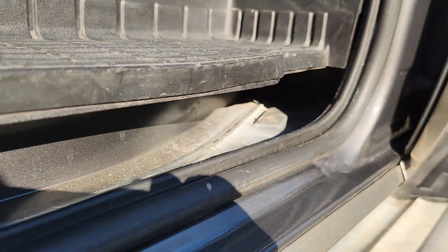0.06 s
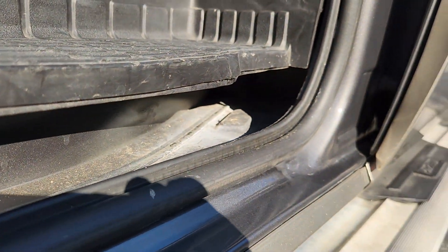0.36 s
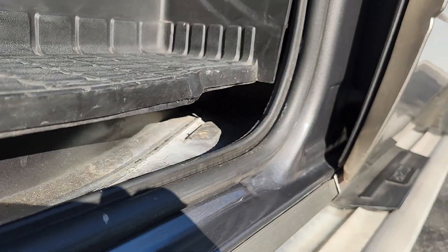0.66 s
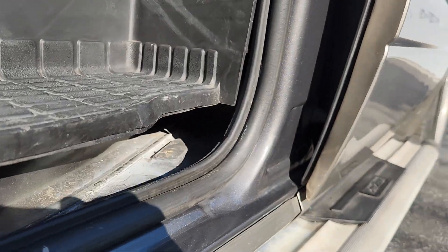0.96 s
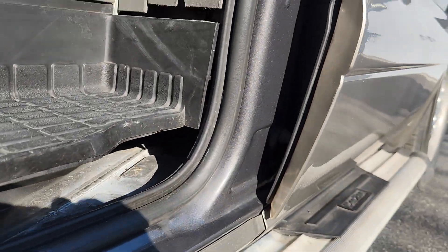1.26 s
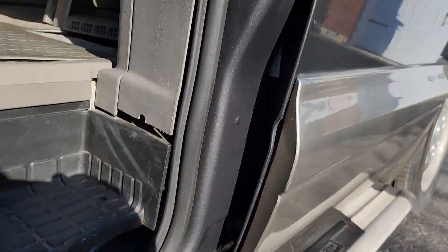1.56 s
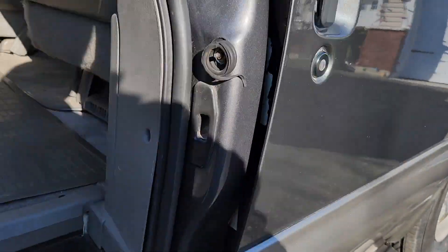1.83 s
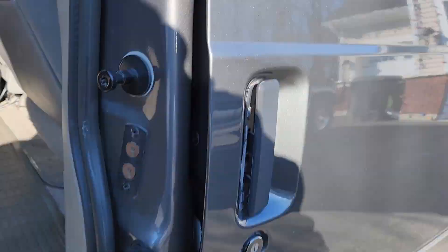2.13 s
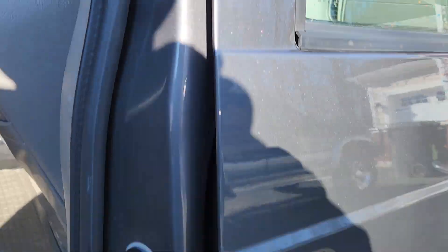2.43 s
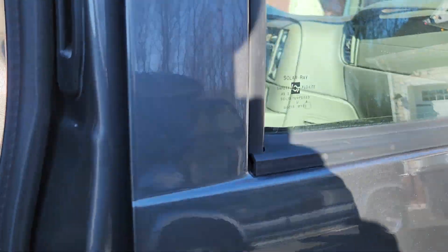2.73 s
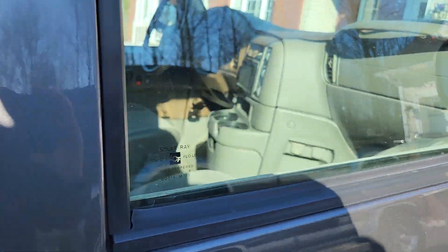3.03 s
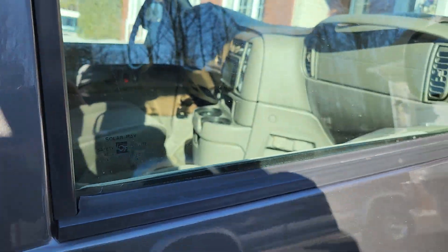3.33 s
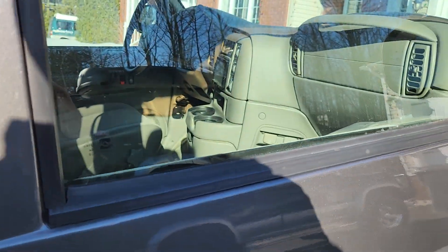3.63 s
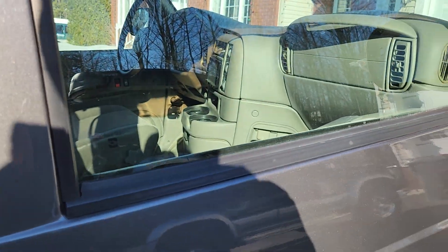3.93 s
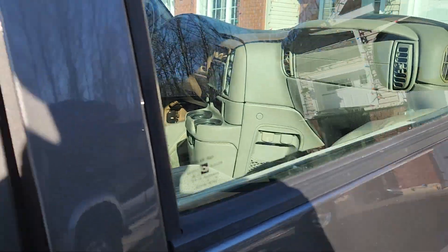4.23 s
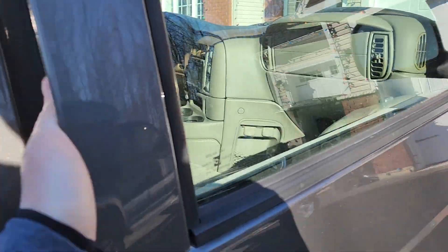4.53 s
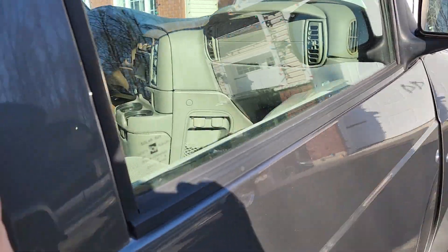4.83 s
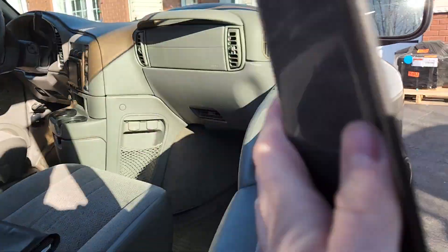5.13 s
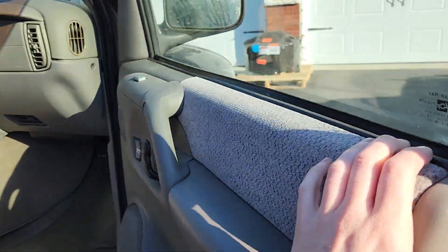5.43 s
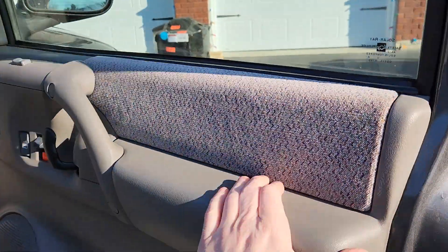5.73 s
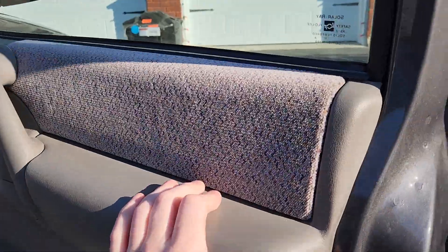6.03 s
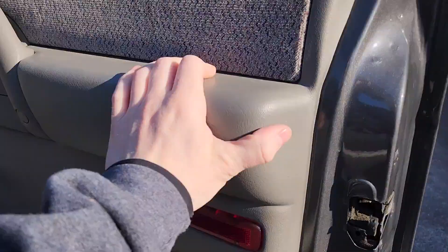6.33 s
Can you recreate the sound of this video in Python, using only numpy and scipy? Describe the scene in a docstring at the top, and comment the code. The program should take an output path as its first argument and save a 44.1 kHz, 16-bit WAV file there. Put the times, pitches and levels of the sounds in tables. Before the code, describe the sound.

A van's sliding door rumbles along its track and slams shut, then the front door unlatches and creaks open, close by outdoors.

```python
"""A van's sliding side door, close by outdoors: freed from its catch, it rolls along its track and
slams into its latch. Blows ring its panel and steel fittings; its rollers drone, rumble and rattle.
Then the front door's handle squeaks, its lock snaps open and it swings out, creaking and clicking
at the hinge check. Keys jingle early on; a hand brushes the cloth trim and pats the armrest.
Air buffets the microphones over a faint outdoor hum."""
import sys
import numpy as np
from scipy import signal
from scipy.fft import rfft, irfft, next_fast_len
from scipy.io import wavfile

SR = 44100
rng = np.random.default_rng(int(sys.argv[2]) if len(sys.argv) > 2 else 0)


def transcribe(u):
    """Save the signal u as a 16-bit wav file named by the first command-line argument.

    u: samples, shape (n,) or (channels, n), limited to [-1, 1]; the rate is SR.
    q: integer samples, one column per channel.
    """
    v = np.clip(np.atleast_2d(u).T, -1, 1)
    q = np.round(v * 32767).astype(np.int16)
    wavfile.write(sys.argv[1], SR, q)


N = 281358
TIME = np.arange(N) / SR

# how hard the sliding door bears on its track, as rumble: (time [s], level [dB])
TRACK_LOAD = [(2.12, -33), (2.19, -38), (2.25, -24.5), (2.38, -21.5), (2.455, -20), (2.53, -19.5),
              (2.63, -19), (2.738, -21.5), (2.84, -23.5), (2.915, -24), (2.986, -20.5), (3.03, -18),
              (3.186, -18.5), (3.22, -21)]
# modes of the sliding door's steel fittings: (frequency [Hz], level [dB], t60 [s])
SLIDER_STEEL_MODES = [(787, 0.5, 0.097), (1170, -12, 0.094), (1370, 0, 0.062), (1330, 2, 0.044),
                      (1500, 0, 0.1), (1980, 1.5, 0.019), (1945, -5, 0.068), (2310, -2, 0.12),
                      (2490, -2.5, 0.039), (3220, -7.5, .07), (3750, -14, .07), (4650, -21.5, 0.059),
                      (6340, -10, 0.084)]
GRIT_DB, GRIT_FADE_DB_PER_S = -34.5, 5.5  # track grit fades as the rollers move away
RESONANCE_DB = 4.5  # how far a door's crowded resonances stand out


def from_db(db):
    """Decibels to gain."""
    return np.exp(np.asarray(db) * (np.log(10) / 20))


def rms_one(x):
    """Scale to unit rms."""
    return x / np.sqrt(np.mean(x ** 2) + 1e-20)


def at_hz(points, hz):
    """Read a spectrum on a log-frequency axis."""
    point_hz, value = np.transpose(points)
    return np.interp(np.log(np.maximum(hz, 1)), np.log(point_hz), value)


def add(track, s, sound):
    """Mix a short sound in at time s."""
    start = int(s * SR)
    track[..., start:start + sound.shape[-1]] += sound[..., :N - start]


def fader(points, fade_s=0.011):
    """A gain that rides through (time [s], level [dB]) points and fades out beyond the ends."""
    s, db = np.transpose(points)
    gate = np.interp(TIME, [s[0] - fade_s, s[0], s[-1], s[-1] + fade_s], [0, 1, 1, 0])
    return gate * from_db(np.interp(TIME, s, db))


def swells(times, lengths, levels_db, shape):
    """Envelope of movements that rise and die away; lengths are widths at half height."""
    power = np.zeros(N)
    for s, length, db in zip(times, lengths, levels_db):
        near = slice(max(int((s - 3 * length) * SR), 0), int((s + 3 * length) * SR))
        from_peak = np.abs(2 * (TIME[near] - s) / length)
        power[near] += (from_db(db) * .5 ** (from_peak ** shape)) ** 2
    return np.sqrt(power)


def decays(times, levels_db, t60s, tail_db, tail_t60):
    """Envelope of dense ringing: a sharp attack, a quick fall and a weaker tail from the hollow body."""
    t, power = TIME[:SR * 3 // 4], np.zeros(N)
    attack = 1 - np.exp(-t / 0.0008)
    for s, level_db, t60 in zip(times, levels_db, t60s):
        fall = from_db(-60 * t / t60) ** 2 + from_db(tail_db - 60 * t / tail_t60) ** 2
        add(power, s, from_db(level_db) ** 2 * fall * attack)
    return np.sqrt(power)


def flutter(rate, depth_db):
    """A random gain of unit rms that changes about rate times a second."""
    knots = rng.standard_normal(20000)
    return rms_one(from_db(depth_db * np.interp(TIME * rate, np.arange(len(knots)), knots)))


def noise(colour, lag_ms=0, ripple_db=0):
    """Stereo noise of unit rms, coloured by (frequency [Hz], level [dB]); the right side lags."""
    # likeness of left and right: (frequency [Hz], correlation [0-1])
    likeness = [(25, 0.8), (80, 0.95), (250, 0.97), (600, 0.62), (1500, 0.43), (4000, 0), (15000, 0.03)]
    size = next_fast_len(N, True)
    hz = np.fft.rfftfreq(size, 1 / SR)
    peaks_and_dips = rng.uniform(0, 1.7, 200) * (-1) ** np.arange(200)
    resonances = np.interp(1.3 * np.sqrt(hz), np.arange(200), peaks_and_dips)
    tone = from_db(at_hz(colour, hz) + ripple_db * resonances)
    mid, side = rfft(rng.standard_normal((2, size))) * tone
    alike = np.clip(at_hz(likeness, hz), 0, 1)
    mid, side = mid * np.sqrt(1 + alike), side * np.sqrt(1 - alike)
    delay = np.exp(-2j * np.pi * hz * lag_ms / 1000)
    return rms_one(irfft([mid + side, (mid - side) * delay], size)[:, :N])


def struck(times, levels_db, modes, lag_ms, spread):
    """Blows ring all modes with random strength and sign; spread [rad] scatters the right's phases."""
    hz, db, t60 = np.transpose(modes)[:, :, None]
    t, out = TIME[:int(t60.max() * SR)], np.zeros((2, N))
    skew = spread * rng.standard_normal(hz.shape)
    left = np.sin(2 * np.pi * hz * t)
    right = np.sin(2 * np.pi * hz * (t - lag_ms / 1000) + skew)
    rings = np.array([left, right]) * from_db(-60 * t / t60) * (1 - np.exp(-t * hz * 4))
    for s, level_db in zip(times, levels_db):
        share = from_db(db[:, 0] + rng.normal(0, 3.2, len(db))) * rng.choice([-1, 1], len(db))
        add(out, s, from_db(level_db) * np.sqrt(2) * (share / np.linalg.norm(share)) @ rings)
    return out


def damped_tones(rows):
    """One decaying sine for each (time [s], level [dB], frequency [Hz], t60 [s])."""
    t, out = TIME[:SR], np.zeros(N)
    for s, db, hz, t60 in rows:
        attack = 1 - np.exp(-t * hz * 4)
        add(out, s, from_db(db - 60 * t / t60) * np.sin(2 * np.pi * hz * t) * attack)
    return out


def outdoors(hum_hz=92, hum_db=-39, fade_db_per_s=48.5):
    """A quiet outdoor bed, with a far engine's hum that fades away."""
    # outdoor ambience: (frequency [Hz], level [dB])
    colour = [(15, -47.5), (25, -25.5), (76, -4), (108, 0.5), (301, -18), (531, -39), (659, -27.5),
              (1160, -48), (2110, -42), (4140, -57.5), (7510, -43), (10400, -61.5), (16000, -61.5)]
    hum = from_db(hum_db - fade_db_per_s * TIME) * np.sin(2 * np.pi * hum_hz * TIME)
    return from_db(-51.0) * noise(colour) + hum


def wind(breeze_db=-71.5):
    """Moving doors and body push puffs of air onto the microphones, over a light breeze."""
    # puffs of air: (time [s], length [s], level [dB])
    gusts = [(1.2, 0.7, -53.5), (1.61, 0.19, -38.5), (2.171, 0.11, -29.5), (2.596, 0.92, -40.5),
             (3.069, 0.15, -30), (3.279, 0.24, -15.5), (3.551, 0.72, -38), (3.961, 0.13, -30),
             (4.333, 0.12, -36.5), (4.596, 0.11, -40), (5.3, 0.34, -36), (5.883, 0.21, -33),
             (6.329, 0.093, -33)]
    # low buffeting: (frequency [Hz], level [dB])
    colour = [(18, 9), (42, 12), (70, 16), (110, 12), (160, -4), (300, -55.5)]
    strength = from_db(breeze_db) + swells(*np.transpose(gusts), shape=1.5)
    return from_db(-1.5) * strength * noise(colour)


def sleeve_drag():
    """The sleeve drags over the plastic armrest with a narrow, grainy hiss."""
    # cloth on plastic: (frequency [Hz], level [dB])
    colour = [(2800, -15), (3900, -4), (4600, 1), (5200, -4), (6500, -27)]
    stroke = swells(times=[6.12], lengths=[0.34], levels_db=[-67], shape=3.6)
    return stroke * noise(colour, lag_ms=0.05) * flutter(rate=120, depth_db=3.0)


def finger_sweep():
    """The woven trim hisses brightly under the fingers."""
    # the fingers' stroke: (time [s], level [dB])
    stroke = [(5.53, -57), (5.57, -51.5), (5.64, -49.5), (5.72, -46.5), (5.78, -71), (5.86, -66)]
    # hiss of the weave: (frequency [Hz], level [dB])
    colour = [(3000, -15), (6000, -7.5), (9500, -6.5), (12000, -5), (15500, 3), (17000, -20)]
    return fader(stroke) * noise(colour, lag_ms=0.014) * flutter(rate=310, depth_db=1.5)


def scrape():
    """Light, even friction stirs two narrow resonances before the sliding door is freed."""
    # the scrape's resonances: (frequency [Hz], level [dB])
    colour = [(900, -25), (1400, -2), (1620, 3), (1850, -9), (2150, -5), (2800, -27)]
    stroke = swells(times=[1.5], lengths=[0.34], levels_db=[-57], shape=6.1)
    return stroke * noise(colour, lag_ms=0.1) * flutter(rate=60, depth_db=5.0)


def handling(rustle_share=0.45):
    """Cloth and skin slide in tiny slips: a dull rub, with rustle and hiss on brighter strokes."""
    # strokes of sleeve and hand: (time [s], length [s], rub level [dB], brightness [dB])
    strokes = [(0.356, 0.12, -83, 2), (1.02, 0.23, -69, -1.5), (1.259, 0.065, -46, -34),
               (1.473, 0.28, -53.5, -9.5), (1.82, 0.61, -62.5, -1.5), (2.073, 0.085, -44, -3.5),
               (3.364, 0.18, -36.5, -36.5), (3.708, 0.033, -49, -38), (3.84, 0.035, -46, -26),
               (3.941, 0.17, -44.5, -38), (4.168, 0.054, -57, -3.5), (4.264, 0.048, -44.5, 0.5),
               (4.362, 0.34, -57, -19.5), (4.687, 0.14, -46.5, -30.5), (4.785, 0.023, -49, -25),
               (4.86, 0.078, -47, -27), (5.25, 0.062, -51, -21), (5.163, 0.16, -53, -19),
               (5.325, 0.08, -43, -12.5), (5.439, 0.054, -48.5, -1), (5.664, .2, -63.5, 3.5),
               (5.756, 0.05, -38, -16.5), (5.804, 0.028, -46.5, -5.5), (5.84, 0.055, -44, -9),
               (6.032, 0.31, -59.5, -11.5), (6.34, 0.18, -55, -9.5)]
    # the three bands of cloth friction: (frequency [Hz], level [dB])
    rub_colour = [(90, -2.5), (160, -5.5), (380, 3.5), (650, -7.5), (1000, -17.5), (1800, -63)]
    rustle_colour = [(600, -12), (1000, -7), (1200, 2), (1550, 6), (2200, 5.5), (2900, -15.5), (3600, -6),
                     (4500, -17), (7000, -15.5)]
    hiss_colour = [(2500, 0.5), (4500, -3), (7500, -4.5), (9500, -13), (12000, -15), (15500, -8)]
    s, length, db, brightness = np.transpose(strokes)
    rub = noise(rub_colour, lag_ms=0.048, ripple_db=RESONANCE_DB) * flutter(rate=28, depth_db=3.0)
    rustle = noise(rustle_colour, lag_ms=0.13, ripple_db=RESONANCE_DB) * flutter(rate=180, depth_db=3.5)
    hiss = noise(hiss_colour, lag_ms=0.036) * flutter(rate=180, depth_db=3.5)
    bands = [(rub, 0, -62, -0.5), (rustle, rustle_share, -84, 1), (hiss, 1, -83, 8)]
    out = 0
    for band, share, floor_db, gain_db in bands:
        motion = swells(s, length, db + share * brightness, shape=2.17)
        # the floor is a faint, steady background hiss and rustle under the strokes
        out += from_db(gain_db) * (motion + from_db(floor_db)) * band
    return out


def keys(count, scatter_s=0.015, pitch_spread=0.02):
    """At each shake the keys slide over each other, and count of them clink with uneven force."""
    # shakes of the bunch: (time [s], level [dB])
    shakes = [(1.744, -51), (1.85, -56.5), (1.99, -58), (2.04, -48), (2.09, -55)]
    # modes of a key: (frequency [Hz], level [dB], t60 [s])
    modes = [(6460, 11, 0.052), (7500, -7, 0.042), (7960, -10, 0.069), (9000, -7, 0.035), (10200, 2, 0.53),
             (11400, 10, 0.078), (12300, -10, 0.043), (13400, -6, .04), (14120, 11, 0.12), (15250, -2, 0.1),
             (15650, -10, 0.031)]
    s, db = np.repeat(shakes, count, axis=0).T
    timing, force, tuning = rng.standard_normal((len(s), 3)).T
    touches = zip(s + scatter_s * timing, db + 1.7 * force, np.exp(pitch_spread * tuning))
    clinks = sum(struck([at], [level_db], np.multiply(modes, [pitch, 1, 1]), lag_ms=0.069, spread=1.5)
                 for at, level_db, pitch in touches)
    s, db = np.transpose(shakes)
    sliding = swells(s, np.full(len(s), .07), db, shape=0.91) * flutter(rate=260, depth_db=7.0)
    colour = [(4000, -21), (6500, -1), (9000, -8), (10500, -9), (13000, -15), (15300, 5), (16500, -15)]
    return clinks + sliding * noise(colour)


def scratches():
    """Metal slips on metal: brief, thin chirps with a slight rasp."""
    # dry scratches: (time [s], length [s], pitch [Hz], level [dB])
    slips = [(1.515, 0.019, 10200, -51), (1.549, 0.0095, 10250, -43), (1.565, 0.023, 10250, -52),
             (1.72, 0.018, 10340, -51), (1.883, 0.014, 8070, -47.5), (1.887, 0.022, 8650, -52),
             (2.108, 0.051, 10200, -54), (2.218, 0.0084, 6570, -42.5), (2.26, 0.013, 8200, -47),
             (2.295, 0.019, 8150, -50)]
    wavering_time = np.cumsum(flutter(rate=2500, depth_db=.19)) / SR
    chirps = sum(swells([s], [length], [db], shape=1.65) * np.sin(2 * np.pi * hz * wavering_time)
                 for s, length, hz, db in slips)
    return np.sqrt(2) * chirps * flutter(rate=490, depth_db=3.5)


def pings():
    """Small metal parts each ring with one flickering note."""
    # metal pings: (time [s], pitch [Hz], level [dB], t60 [s])
    notes = [(4.653, 3800, -49, 0.044), (5.430, 8660, -52, 0.39), (5.437, 3640, -30.5, 0.027),
             (5.447, 5130, -39.5, 0.11), (5.466, 4900, -47, 0.042), (5.965, 5000, -54, .05)]
    return damped_tones([(s, db, hz, t60) for s, hz, db, t60 in notes]) * flutter(rate=400, depth_db=5.0)


def body_thumps(width_octaves=0.22):
    """A shove sets the van's body booming, most in the modes near its own pitch."""
    # heavy shoves: (time [s], level [dB], centre [Hz])
    shoves = [(1.792, -19, 730), (1.801, -26, 487), (1.811, -23, 322), (2.076, -16, 112),
              (2.078, -19.5, 410), (2.235, -22.5, 328), (2.425, -16.5, 199), (3.104, -13.5, 68.5),
              (3.227, -10, 44.45), (3.247, -10.5, 566), (3.3, -14, 170.5), (3.311, -16, 59),
              (3.418, -28, 262), (3.486, -24.5, 71.4), (3.853, -27.5, 147), (3.881, -28.5, 413),
              (3.93, -18.5, 97), (3.934, -25.5, 196.6), (3.972, -26, 165.4), (4.015, -25.5, 66.6),
              (4.274, -21, 650), (4.275, -20.5, 140.8), (4.279, -25, 450), (4.284, -21.5, 190),
              (4.292, -26.5, 250), (5.186, -29, 103.4), (5.429, -22, 84), (5.735, -20.5, 103),
              (5.747, -21, 119), (5.838, -16.5, 325)]
    # modes of body and cabin: (frequency [Hz], t60 [s])
    modes = [(41.4, 0.69), (57, 0.84), (72, 0.22), (89, 0.12), (111, 0.16), (133, 0.083), (153, 0.42),
             (178, 0.18), (225, 0.29), (275, 0.066), (345, 0.05), (413, 0.086), (475, 0.041), (540, 0.068),
             (615, 0.042), (700, 0.034), (855, 0.075)]
    hz, t60 = np.transpose(modes)
    tones = []
    for s, db, centre_hz in shoves:
        share = 1 / (1 + (np.log2(hz / centre_hz) / width_octaves) ** 2) ** 2
        levels_db = db + 20 * np.log10(share / np.linalg.norm(share))
        tones += [(s, *mode) for mode in zip(levels_db, hz, t60)]
    return damped_tones(tones)


def door_blows(hits, panel_modes, steel_modes, *, lag_ms, panel_lag_ms, panel_db, thud_db, steel_db,
               shimmer_db, clack_db, crack_db, tick_db, t60, tail_db, tail_t60):
    """Blows ring panel and steel; small parts merge into clack, crack and tick, brighter if harder."""
    s, panel, clack, hardness = np.transpose(hits)
    crack, tick = clack + 0.44 * hardness, clack + hardness  # mid and top treble levels
    t60 = t60 * .5 ** (hardness / 31)  # a blow 31 dB harder rings half as long
    out = struck(s, panel + panel_db, panel_modes, panel_lag_ms, spread=0.32)
    out += struck(s, clack + steel_db, steel_modes, lag_ms, spread=1.0)
    # rods and springs shimmer on after the contact
    for level_db, low_hz, high_hz in [(crack, 2800, 9000), (tick, 9000, 15800)]:
        ring_s = rng.uniform(.012, .05, size=100)
        rods = np.c_[rng.uniform(low_hz, high_hz, size=100), rng.normal(0, 3, size=100), ring_s]
        out += struck(s, level_db + shimmer_db, rods, lag_ms, spread=1.0)
    clacks = noise([(250, -18), (550, 1.5), (850, 0), (1150, 4.5), (1500, 4), (2350, -1), (2900, -6),
                    (4200, -35.5)], lag_ms, RESONANCE_DB)
    cracks = noise([(2000, -19.5), (3100, 2), (4500, 0.5), (7000, -1.5), (9000, -12.5), (12000, -13.5)],
                   lag_ms, RESONANCE_DB)
    ticks = noise([(6500, -16), (9000, -0.5), (11500, -3), (13000, 3.5), (14600, 4.5), (15900, -0.5),
                   (17000, -17.5)], lag_ms, RESONANCE_DB)
    clatter = clacks * decays(s, clack + clack_db, t60 * 1.74, tail_db, tail_t60)
    clatter += cracks * decays(s, crack + crack_db, t60, tail_db - 0.5, tail_t60 * 0.88)
    clatter += ticks * decays(s, tick + tick_db, t60 * 0.75, tail_db - 1.5, tail_t60 * .5)
    # trim and insulation add a dull thud with no note of its own
    thuds = noise([(90, -15.5), (170, 2.5), (260, 2.5), (400, 0.5), (650, -5.5), (900, -9), (1400, -41)],
                  panel_lag_ms)
    out += thuds * decays(s, panel + thud_db, np.full(len(s), .11), tail_db=-7.5, tail_t60=0.32)
    return out + clatter * flutter(rate=500, depth_db=3.0)  # loose parts chatter within each blow


def handle_squeak(level_db=-64):
    """The front handle's dry pivot sings in scratchy bits, with an unsteady pitch."""
    # the squeak's glide: (time [s], pitch [Hz])
    glide = [(4.06, 10500), (4.105, 10800), (4.13, 13000), (4.145, 12200), (4.2, 11900), (4.225, 10400)]
    s, hz = np.transpose(glide)
    pitch = np.interp(TIME, s, hz) * flutter(rate=1500, depth_db=.16)
    level = fader([(s[0], level_db), (s[-1], level_db)]) * flutter(rate=150, depth_db=3.5)
    return level * np.sin(2 * np.pi * np.cumsum(pitch) / SR)


def hinge_creak():
    """The hinge sticks and slips; each slip gives a short ring."""
    # the hinge's swing: (time [s], slip rate [1/s], level [dB])
    swing = [(5.10, 73, -52), (5.127, 98, -41), (5.175, 88, -36), (5.193, 150, -48), (5.235, 180, -47),
             (5.28, 150, -49), (5.325, 150, -47)]
    # modes rung by a slip: (frequency [Hz], level [dB], t60 [s])
    modes = [(390, 1.5, 0.053), (590, -9, 0.035), (870, 1, 0.035), (1180, 5, 0.0081), (1570, -0.5, 0.024),
             (1900, -0.5, 0.026), (2250, -8, 0.02), (2980, -17, 0.026)]
    s, per_s, db = np.transpose(swing)
    slip_rate = np.interp(TIME, s, per_s, left=0, right=0) * flutter(rate=55, depth_db=1.5)
    slip_count = np.floor(np.cumsum(slip_rate) / SR)
    slips = TIME[1:][np.diff(slip_count) > 0]
    return struck(slips, np.interp(slips, s, db), modes, lag_ms=0.11, spread=0.93)


def door_check():
    """The check's arm groans with friction; its sprung roller snaps drily into each detent."""
    # snaps into the detents: (time [s], level [dB])
    detents = [(5.332, -24.5), (5.4075, -31), (5.273, -48)]
    # modes of the check: (frequency [Hz], level [dB], t60 [s])
    modes = [(1070, -2, 0.041), (2700, 0, 0.049), (3040, 1, 0.045), (3340, -2, .035), (3670, -1, 0.038),
             (4680, -3.5, 0.036), (5950, -9, .025), (14500, -4, .015)]
    # the arm's low, hollow groan: (frequency [Hz], level [dB])
    groan_colour = [(200, -24), (330, -5), (388, -1), (450, -6), (530, -26), (598, -12), (720, -25),
                    (872, -17), (1100, -24), (1440, -31), (2400, -56)]
    snaps = struck(*np.transpose(detents), modes, lag_ms=0.053, spread=0.63)
    pull = swells(times=[5.245], lengths=[0.055], levels_db=[-36], shape=4.8)
    return snaps + pull * noise(groan_colour, lag_ms=0.091)


def front_door():
    """Knocks and snaps ring the front door as it is unlatched and swung open."""
    # blows on the door: (time [s], panel level [dB], steel level [dB], hardness [dB])
    hits = [(3.847, -33, -34.5, -17), (3.874, -32, -39, 0), (3.932, -33, -49, -27), (3.974, -42, -61, -23),
            (3.994, -52, -53, 9), (4.135, -50, -55, -7), (4.165, -53, -59, -15), (4.235, -30, -37, -13),
            (4.26, -30, -26, 6.5), (4.273, -22.5, -24.5, -11), (4.292, -31, -44, -15),
            (4.439, -65, -44.5, -24), (4.457, -44.5, -38.5, -24.5), (4.552, -51, -61.5, -2),
            (4.653, -38, -49.5, -20), (4.686, -37, -47.5, -4), (4.764, -44.5, -56.5, -9),
            (4.814, -45, -44.5, -33), (4.829, -37, -44.5, -12.5), (4.889, -46, -58, -14),
            (4.954, -47.5, -48.5, -45), (4.995, -43.5, -60, -25), (5.076, -52, -52, -10),
            (5.115, -45, -58, -20), (5.271, -48, -41, -19), (5.281, -63, -46, -20),
            (5.332, -46, -27.5, -14), (5.336, -44, -33, -23), (5.376, -53, -43, -34), (5.407, -48, -34, -2),
            (5.437, -39.5, -45, -8), (5.737, -32.5, -53, -23), (5.81, -34, -31.5, -30),
            (5.839, -32.5, -35, -18), (5.926, -49, -45, -40), (6.073, -75, -47.5, -1.5),
            (6.338, -50, -35, -27.5)]
    # modes of its panel and steel fittings: (frequency [Hz], level [dB], t60 [s])
    panel_modes = [(130.6, -2.5, 0.54), (158.5, -0.5, 0.13), (227.3, -2, 0.36), (279.5, -1, 0.41),
                   (335, 0.5, 0.17), (393, 4.5, 0.16), (465, -2, 0.096), (542, 2, 0.094), (619, 0.5, 0.13),
                   (754, -9.5, 0.051), (830, -15, 0.043)]
    steel_modes = [(695, 1, 0.07), (1003, -2, 0.079), (1240, 1, 0.083), (1420, 0.5, 0.049),
                   (1552, 1.5, 0.071), (1835, 1, 0.055), (2080, 9, 0.055), (2300, -8, 0.116),
                   (2430, -8, 0.088), (2990, -6, 0.085), (3530, -10.5, 0.11), (4000, -7, 0.063)]
    return door_blows(hits, panel_modes, steel_modes, lag_ms=0.14, panel_lag_ms=0.19,
                      panel_db=-2.5, thud_db=-2.5, steel_db=-0.5, shimmer_db=-0.5,
                      clack_db=3.5, crack_db=0.5, tick_db=7.0, t60=0.019, tail_db=-7, tail_t60=0.11)


def rattle(count):
    """Loose fittings tap at random while the sliding door rolls, fainter as they move away."""
    taps = rng.uniform(2.22, 3.2, count)
    rolled_s = taps - TRACK_LOAD[0][0]
    levels_db = GRIT_DB - GRIT_FADE_DB_PER_S * rolled_s + rng.normal(-6.5, 1.7, count)
    return struck(taps, levels_db, SLIDER_STEEL_MODES, lag_ms=0.17, spread=.9)


def track_rumble(grit_follows=0.85):
    """The dirty track rumbles under the rollers; its grit follows most of the rumble's swing."""
    s, db = np.transpose(TRACK_LOAD)
    grit_db = GRIT_DB + grit_follows * (db - db.mean()) - GRIT_FADE_DB_PER_S * (s - s[0])
    bumps = flutter(rate=130, depth_db=2.0)
    # the track's rumble and grit: (frequency [Hz], level [dB])
    rumble_colour = [(41, -37.5), (70, -17), (145, -2.5), (251, -4.5), (285, -1.5), (323, -4.5),
                     (465, -9.5), (533, -13.5), (660, -16), (848, -17.5), (926, -33.5), (1400, -33),
                     (1820, -63), (3080, -120)]
    grit_colour = [(530, -21.5), (900, 0.5), (1440, -5.5), (2120, -4.5), (3430, -17.5), (6250, -26),
                   (6800, -29.5), (7770, -25.5), (11000, -33.5), (14700, -28), (16000, -32)]
    rumble = from_db(-2.5) * noise(rumble_colour, lag_ms=0.16) * bumps
    grit = noise(grit_colour, lag_ms=0.424, ripple_db=RESONANCE_DB)
    grit *= flutter(rate=260, depth_db=2.5) * flutter(rate=40, depth_db=2.0)
    return fader(TRACK_LOAD) * rumble + fader(np.c_[s, grit_db]) * grit


def roller_drone(lag_ms=0.3):
    """Each roller's bumps drum on the panel as a drone whose pitch follows its speed."""
    # each roller's run along the track: (time [s], bump rate [Hz], level [dB])
    lower_roller = [(2.15, 112, -40.5), (2.3, 126, -34.5), (2.35, 163, -28), (2.43, 182, -23.5),
                    (2.52, 196, -33.5), (2.58, 201, -25.5), (2.65, 191, -27), (2.73, 166.5, -18.5),
                    (2.78, 164, -18.5), (2.83, 136, -26.5), (2.9, 163, -25), (2.98, 180, -23),
                    (3.03, 183, -21), (3.1, 194, -24.5), (3.21, 200, -49)]
    upper_roller = [(2.17, 259, -36), (2.25, 263.4, -35), (2.369, 263.2, -39), (2.45, 253.6, -22.5),
                    (2.53, 261.3, -28.5), (2.599, 249.3, -28.5), (2.68, 234.1, -36), (2.74, 214.1, -18.5),
                    (2.799, 197.7, -30.5), (2.92, 197.8, -24), (2.97, 221.5, -47), (3.01, 235.9, -20.5),
                    (3.06, 245.2, -24), (3.13, 229.8, -20.5), (3.21, 221.8, -27.5)]
    # how the panel answers the rollers: (frequency [Hz], gain [dB])
    panel_response = [(100, -9), (150, -3), (195, -20.5), (232, 1.5), (260, -0.5), (285, -5), (325, -4.5),
                      (400, -1), (460, -15), (520, -9), (580, -10), (680, -25), (860, -24.5), (1100, -34.5)]
    stereo_lag_s = np.array([[0], [lag_ms / 1000]])
    drone = np.zeros((2, N))
    for roller in (lower_roller, upper_roller):
        s, bump_hz, db = np.transpose(roller)
        pitch = np.interp(TIME, s, bump_hz) * flutter(rate=90, depth_db=0.1)
        load = fader(np.c_[s, db])
        rolling = slice(int((s[0] - .02) * SR), int((s[-1] + .02) * SR))
        phase = 2 * np.pi * (np.cumsum(pitch) / SR - pitch * stereo_lag_s)[:, rolling]
        for harmonic in range(1, 5):
            strength = load * flutter(rate=140, depth_db=2.5)
            resonance = from_db(at_hz(panel_response, harmonic * pitch[rolling]))
            tone = np.sqrt(2) * np.sin(harmonic * phase + rng.uniform(0, 2 * np.pi))
            drone[:, rolling] += strength[rolling] * resonance * tone
    return drone


def latch():
    """The claw slips off its catch; at the slam the guide pin clicks, claw bounces and pawl drops."""
    # the claw's release, then its bounces on the striker: (time [s], level [dB])
    strikes = [(2.029, -29), (2.061, -41), (3.243, -10.5), (3.253, -15.5), (3.262, -13.5), (3.276, -28),
               (3.291, -16), (3.3, -28), (3.316, -28.5), (3.331, -31), (3.352, -37)]
    # modes of claw, guide pin and pawl: (frequency [Hz], level [dB], t60 [s])
    claw_modes = [(1310, -14, .23), (1816, -15, .27), (1970, -12.5, 0.37), (2020, -12.5, .22),
                  (2160, 1, .04), (2260, -6.5, 0.17), (2310, 9.5, 0.035), (2317, -5.5, 0.16),
                  (2340, 6, 0.035), (2449, -7, 0.11), (2530, -11.5, 0.17), (2885, -14, .11),
                  (3305, -19, 0.27), (3526, -18.5, .19)]
    pin_modes = [(1560, -3, .04), (1750, -0.5, .05), (1920, 1.5, 0.056), (2500, -4, .035),
                 (2700, -9.5, .03), (5040, -7.5, .015)]
    pawl_modes = [(1020, 1, .09), (1115, 4, .082), (2090, -15, 0.083), (2525, -7, 0.077), (2930, 4, 0.034),
                  (3240, -3, 0.059), (5660, -19, 0.14), (8440, -12, .055)]
    stereo = dict(lag_ms=.424, spread=.3)
    pin = struck(times=[3.2245], levels_db=[-13], modes=pin_modes, **stereo)
    pawl = struck(times=[3.486], levels_db=[-25.5], modes=pawl_modes, **stereo)
    claw = struck(*np.transpose(strikes), claw_modes, **stereo)
    return pin + claw + pawl


def sliding_door():
    """The sliding door clunks free, knocks along its track and slams shut, ringing panel and steel."""
    # blows on the door: (time [s], panel level [dB], steel level [dB], hardness [dB])
    hits = [(0.871, -79, -46.5, -16.5), (1.103, -53.5, -65, 20), (1.589, -75, -50, 5),
            (1.792, -31, -30.5, -10.5), (1.811, -31.5, -49, -26), (2.029, -35.5, -34.5, -10),
            (2.061, -51, -35.5, 2), (2.076, -20, -30, -19), (2.087, -22, -31.5, -14),
            (2.167, -53, -23.5, -3.5), (2.177, -31.5, -22, -7.5), (2.186, -40, -28.5, -6),
            (2.613, -26.5, -37, -7), (2.795, -47.5, -28.5, -7), (3.172, -35.5, -38.5, -11),
            (3.225, -19.5, -23.5, -13), (3.243, -17, -15, -19.5), (3.249, -15.5, -20, 4),
            (3.263, -26.5, -20, 4), (3.275, -33.5, -33, -3), (3.29, -24, -20.5, 5.5),
            (3.331, -28, -32, -20), (3.358, -31.5, -38.5, -16), (3.387, -36.5, -47, -11),
            (3.42, -38, -56, -16), (3.453, -43, -53, -10), (3.487, -34, -34.5, -7)]
    # modes of its panel: (frequency [Hz], level [dB], t60 [s])
    panel_modes = [(144.8, -1, 0.17), (217.6, -4, 0.39), (234.4, -5, 0.53), (295, 2, 0.17), (354, 1, 0.14),
                   (405, -1.5, 0.18), (449, -5, 0.16), (542, -1, 0.11), (636, -13, 0.085),
                   (724, -2.5, 0.12), (865, -12, 0.16)]
    return door_blows(hits, panel_modes, SLIDER_STEEL_MODES, lag_ms=0.392, panel_lag_ms=0.26,
                      panel_db=-1.0, thud_db=2.5, steel_db=-7.0, shimmer_db=-1.5,
                      clack_db=4.0, crack_db=1.0, tick_db=3.0, t60=0.025, tail_db=-13.5, tail_t60=0.23)


def scene():
    """Mix both doors and their hardware with the keys, the hand and the air."""
    impacts = sliding_door() + front_door() + body_thumps() + pings()
    slider_hardware = roller_drone() + track_rumble() + rattle(count=55) + latch()
    front_hardware = handle_squeak() + hinge_creak() + door_check()
    foley = scratches() + keys(count=8) + handling() + scrape() + finger_sweep() + sleeve_drag()
    return impacts + slider_hardware + front_hardware + foley + wind() + outdoors()


def record(dry, cutoff_hz=16000):
    """The two microphones colour the sound differently; peaks are rounded and the top is cut."""
    # stereo balance: (frequency [Hz], left over right [dB])
    balance = [(60, 0.5), (200, 0.5), (800, 1), (1500, -2.5), (2400, -2.5), (4400, 2.5), (7000, 0.5),
               (9500, 6.5), (15000, 8.5)]
    size = next_fast_len(N + 2048, True)
    balance_db = at_hz(balance, np.fft.rfftfreq(size, 1 / SR))
    pan = from_db([balance_db / 2, -balance_db / 2])
    pan /= np.sqrt(np.mean(pan ** 2, axis=0))  # constant power
    heard = irfft(rfft(dry, size) * pan, size)[:, :N]
    high_cut = signal.ellip(10, .2, 80, cutoff_hz, fs=SR, output="sos")
    return signal.sosfilt(high_cut, np.tanh(heard))


dry = scene()
out = record(dry)
transcribe(out)
```